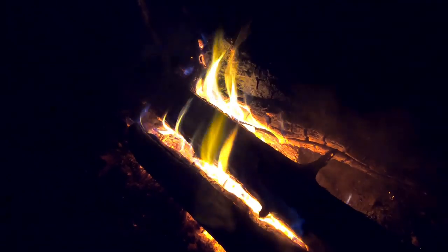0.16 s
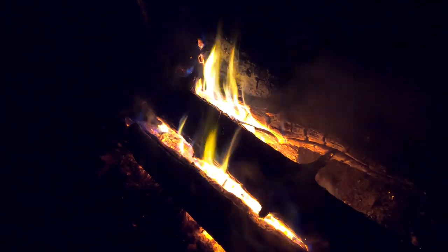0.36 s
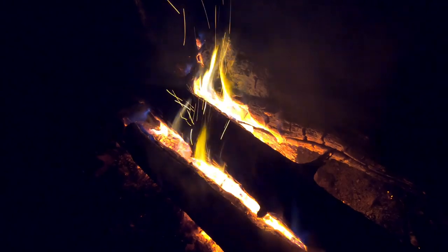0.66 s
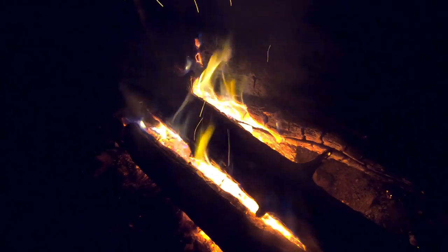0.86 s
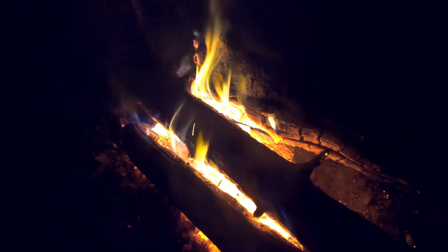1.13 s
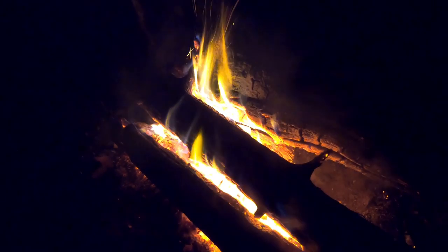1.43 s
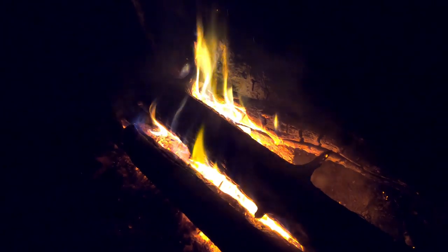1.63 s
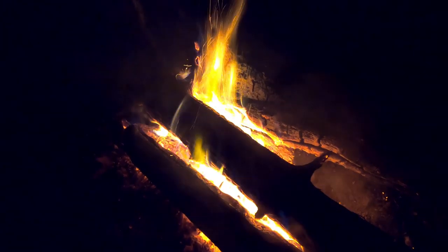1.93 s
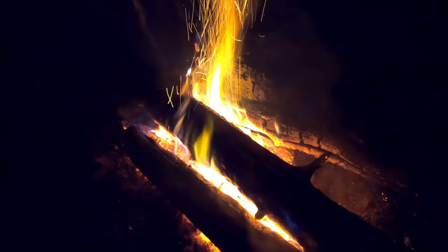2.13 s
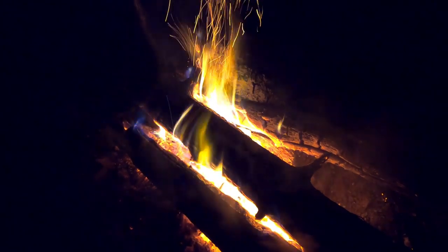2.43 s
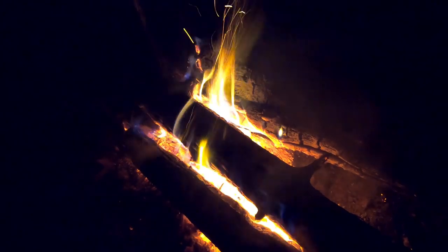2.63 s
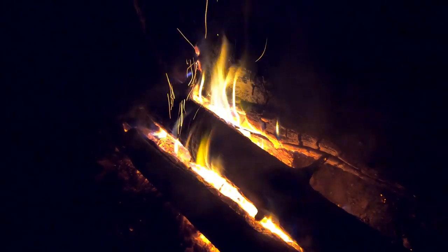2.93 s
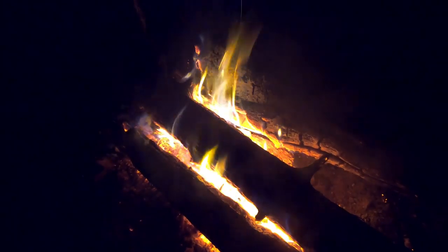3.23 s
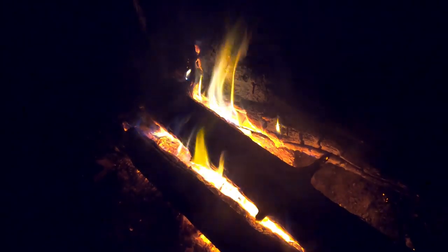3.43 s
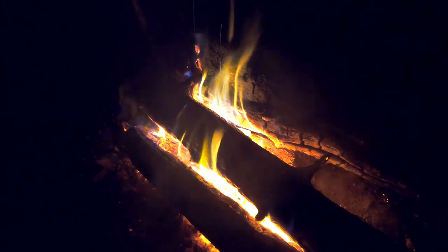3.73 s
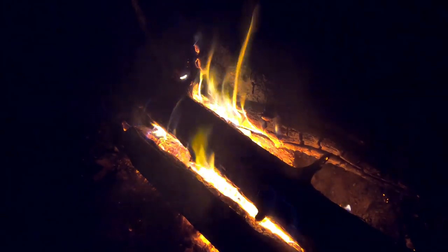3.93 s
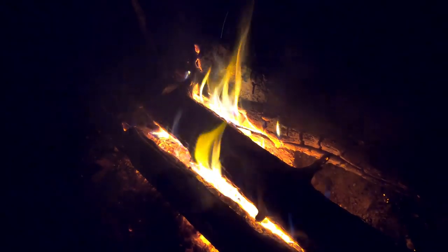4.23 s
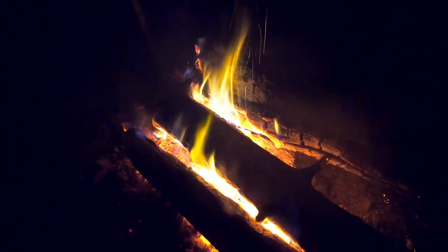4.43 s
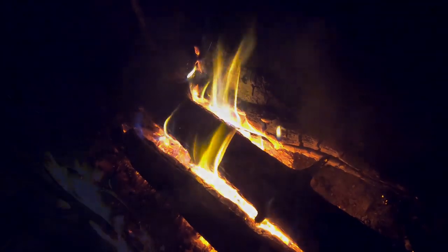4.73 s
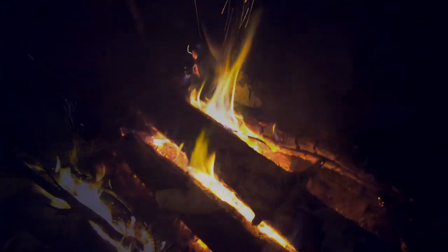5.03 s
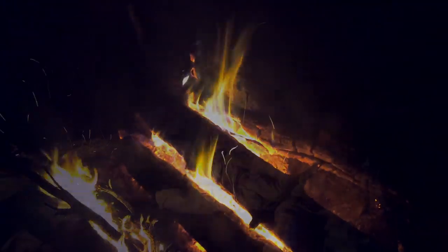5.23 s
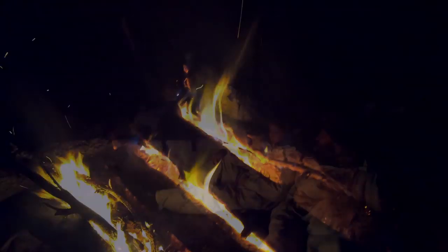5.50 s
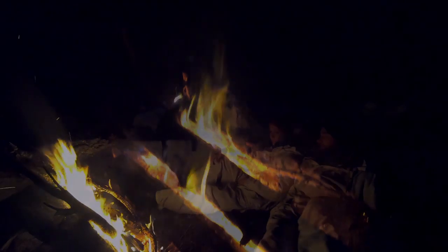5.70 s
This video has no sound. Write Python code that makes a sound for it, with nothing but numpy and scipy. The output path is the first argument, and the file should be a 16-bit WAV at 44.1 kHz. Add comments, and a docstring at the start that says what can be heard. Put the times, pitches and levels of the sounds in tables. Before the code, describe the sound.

Burning logs snap and tick close up, with quiet gas hiss and low flame flutter, before a rougher fire bursts in at the end.

```python
"""A faint tick over low, fluttering flames and hissing gas comes first, then sharp pops from a campfire at night.
Pops are short damped swings with a spray of noise, as pockets of steam burst in the logs; embers tick faintly.
Flames, gas and a distant drone are shaped noise with wandering levels; soft puffs are short swells of noise.
Near the end a livelier blaze, made of gritty noise, joins from the right."""
import sys
import numpy as np
from scipy import signal
from scipy.fft import rfft, irfft, next_fast_len
from scipy.io import wavfile
from scipy.ndimage import uniform_filter1d, map_coordinates

SR = 44100
rng = np.random.default_rng(int(sys.argv[2]) if len(sys.argv) > 2 else 0)


def dump(signal):
    """Clip the signal to [-1, 1] and save it as 16-bit WAV at the path in sys.argv[1]."""
    limited = np.clip(np.atleast_2d(signal).T, -1, 1)
    pcm = np.round(limited * 32767).astype(np.int16)
    wavfile.write(sys.argv[1], SR, pcm)


N = 258398  # length in samples

# Levels are settings before the fixed trims in the functions; noise colours give shape only.
# Steady flames: t/s, flutter level/dB
FLAME_LEVELS = [(0.0, -70), (0.21, -71.5), (0.67, -77.5), (0.92, -79.5), (1.13, -73), (1.24, -70.5),
                (1.59, -80), (1.96, -74), (2.39, -78), (3.28, -77), (3.48, -74), (4.79, -77.5), (5.35, -77),
                (5.5, -79.5)]
# Colour of the flames' flutter: f/Hz, level/dB per Hz
FLUTTER_COLOUR = [(53, -38), (90, -20), (130, -8), (167, 2.5), (220, -7.5), (311, -15), (362, -14),
                  (409, -15.5), (500, -35), (650, -57.5), (1100, -120)]
# Colour of the low draught: f/Hz, level/dB per Hz
DRAUGHT_COLOUR = [(12, -34.5), (20, 6.5), (86, 2.5), (110, -10.5), (140, -34), (240, -120)]
# Escaping gas: t/s, hiss level/dB
GAS_LEVELS = [(0.0, -74), (1.71, -72), (2.1, -70), (2.82, -77), (3.46, -72), (3.83, -75), (4.41, -71.5),
              (5.38, -75.5), (5.5, -71.5)]
# Colour of the hiss: f/Hz, level/dB per Hz
HISS_COLOUR = [(710, -42), (1200, -4.5), (2310, -1), (2470, -3.5), (3190, 1.5), (5070, -2), (6000, -8),
               (7800, -44.5), (13200, -120)]
# Colour of the finer, higher fizz: f/Hz, level/dB per Hz
FIZZ_COLOUR = [(2940, -45), (5000, -19.5), (5990, -1.5), (8200, -10.5), (9290, -4.5), (11200, -20.5),
               (14900, -28), (16500, -35.5)]
# Colour of the gas blowing off after the biggest burst: f/Hz, level/dB per Hz
VENT_COLOUR = [(300, -29.5), (550, -9), (1200, -6.5), (2500, 0.5), (3500, -1.5), (5500, -6.5),
               (9000, -12.5), (11000, -24.5), (16000, -50.5)]
# Colour of the distant drone: f/Hz, level/dB per Hz
DRONE_COLOUR = [(250, -39), (400, -7), (550, -11.5), (800, -1.5), (1000, -10.5), (1500, -18.5),
                (2500, -44.5)]
# Bursting steam pockets: t/s, burst level/dB, crack f/Hz, crack t60/s, thump level/dB, wood f/Hz,
# wood level/dB, splinter level/dB, left-minus-right level/dB, scatter level/dB
BURSTS = [(0.0004, -35.5, 3300, 0.004, -51, 700, -40, 3.5, 1, -11),
          (0.114, -15, 4900, 0.00029, -30.5, 560, -6.5, -0.5, -1, -14),
          (0.3536, -55, 2600, 0.0039, -43, 829, -29, 13, 0, -18),
          (0.3701, -38, 6900, 0.00085, -43, 660, -30, -23, -2, -14),
          (0.4373, -51.5, 3400, 0.0023, -15, 457, -21, 9, 0, -6),
          (0.5751, -2.5, 2910, 0.00099, -34, 730, -64, -6.5, -1.5, -14),
          (0.6001, -34, 3200, .00093, -16.5, 643, -8, -17, 0.5, -18),
          (0.635, -44, 3600, 0.0013, -30.5, 767, -25, 4, -2.5, -2),
          (0.6883, -47.5, 2960, 0.0016, -18.5, 640, 1.5, -1, 4.5, -7),
          (0.7031, -33, 3050, .00088, -40, 1375, -41, -8, -2.5, -7),
          (0.7189, -47, 1710, 0.0025, -28.5, 907, -8, 2, 3, -14),
          (0.7498, -7.5, 3387, .00098, -53.5, 1435, -27, 0, -1.5, -17.5),
          (1.1496, -51.5, 3140, 0.0012, -17.5, 797, -14.5, 5, -5, -1),
          (1.3221, -2.5, 3730, 0.0007, -42.5, 1241, -19.5, -13.5, -1, -14),
          (1.3624, -5.5, 2950, 0.00078, -32.5, 972, -28.5, -38, 2.5, -13.5),
          (1.6378, -11.5, 4940, 0.00058, -33, 604.6, -11, -6, -5.5, -13.5),
          (1.7084, -25.5, 2840, 0.0041, -40, 1400, -25, 15, 3, -28.5),
          (1.9052, 3, 2870, 0.00094, -18, 778, -16.5, -17, 1, -16),
          (1.9798, -32.5, 2840, 0.0011, -23.5, 1480, -29, 2, 0, -16),
          (2.3147, -1.5, 3167, 0.00086, -47.5, 978, -27, -5, 2.5, -21.5),
          (2.4965, -37, 3240, 0.00085, -36, 1460, -38.5, 1.5, 0, -10.5),
          (2.553, -41.5, 3340, 0.0017, -36, 883, -32.5, -27.5, -6, -16),
          (2.6947, -19, 3680, 0.00083, -34, 780, -50, 2.5, -5.5, -26),
          (2.7413, -2.5, 3407, 0.00084, -46.5, 1283, -35, -14, -0.5, -14.5),
          (2.958, -58.5, 8500, 0.00098, -18, 770, -23.5, 13.5, -1, -16),
          (3.158, -49.5, 4510, 0.00092, -41.5, 1226, -26.5, 0, -3, -26),
          (3.1793, -47.5, 3640, 0.0037, -35, 1167, -12.5, 5, -5, -8),
          (3.2532, -13, 4000, 0.0014, -58, 785, -14, -2, 1, -8),
          (3.387, -50, 3050, 0.0091, -24.5, 800, -25, -35, -5.5, -5.5),
          (3.4367, -51, 3960, 0.0014, -22.5, 850, -16, 3.5, -4, -11),
          (3.474, -27.5, 3112, .0013, -61, 1312, -47, -1.5, -5, -13),
          (3.5221, -40, 3820, 0.0024, -25, 834, -31, 2.5, -2, -8),
          (3.5619, -49.5, 2490, .001, -9, 677, -21, -9, -6.5, -19),
          (3.889, -21, 2580, 0.0032, -27.5, 616, -4, -6, -2, -12.5),
          (4.124, -48.5, 3584, 0.0026, -23.5, 684, -24, -23.5, -4, -18.5),
          (4.1709, -52.5, 5960, 0.0014, -11, 817, -21.5, 6.5, -4, -17.5),
          (4.3978, -5.5, 2370, 0.00042, -32, 862.4, -17, -7.5, -2, -13.5),
          (4.51, -50.5, 2750, 0.0024, -29, 1110, -15, -19.5, 1.5, -16.5),
          (4.5686, -39, 2890, 0.0021, -32, 1440, -24, 2.5, -2, -6.5),
          (4.6232, -29.5, 3700, 0.0021, -57, 1068, -48, 2, 2.5, -8.5),
          (4.635, -38, 3170, 0.0017, -43, 872, -28, -16, -4, -11),
          (4.8157, -3.5, 2380, 0.00067, -34.5, 700, -24, -18, 0.5, -12),
          (4.959, -41.5, 2860, 0.0019, -29.5, 730, -27.5, -2, -1.5, -5.5),
          (5.0684, -3, 3240, 0.00097, -36, 638, -52, -10.5, -5.5, -17.5),
          (5.371, -49.5, 3220, 0.0031, -32, 785, -23, 3, -6, -4),
          (5.3859, -45, 1652, 0.0014, -32, 947, -20, 1, 2, 0),
          (5.4073, -48, 3000, 0.00086, -28, 848, -21, -5, -5, -16),
          (5.47, -49, 3470, .003, -11, 735, -17, -26, -6.5, -19),
          (5.5548, -23, 5680, 0.00047, -30, 649, -39.5, -23, -5, -15),
          (5.6604, -43, 2030, 0.0011, -24, 1100, -13, -28, -12, -24),
          (5.699, -36.5, 2820, 0.0013, -29, 1420, -27, -5, -16, -1),
          (5.7156, -41, 2080, 0.0019, -40.5, 977, -20, -5.5, -32.5, -14)]
# Colour of the splinter spray: f/Hz, level/dB
SPLINTER_COLOUR = [(300, -49.5), (1200, -9), (3500, -6), (6500, 1), (9000, 1.5), (11000, -14), (16000, -22)]
# How fast the clearing's echoes die away: f/Hz, t60/s
CLEARING_DECAY = [(200, 0.24), (1000, 0.066), (4000, 0.025), (10000, 0.12)]
# Strength of those echoes, as long waves pass over the logs: f/Hz, level/dB
CLEARING_COLOUR = [(150, -9), (800, -5.5), (2000, 0), (8000, -1)]
# How strongly a blast front reaches the microphone ports: f/Hz, level/dB
FRONT_COLOUR = [(20, -26.5), (50, -5), (90, -5), (6500, -0.5), (8000, -8), (10000, -5), (12000, -14),
                (16000, -22.5)]
# Flame puffs: t/s, puff level/dB, time to the envelope's peak times four/s
PUFF_EVENTS = [(0.082, -53.5, 0.01), (0.203, -79, 0.035), (0.23, -56, 0.018), (0.273, -56, 0.01),
               (0.479, -58.5, 0.013), (0.851, -53.5, 0.0081), (1.102, -67, 0.013), (2.158, -59, 0.02),
               (2.653, -56.5, 0.02), (2.932, -64, 0.028), (3.312, -63, 0.024), (3.527, -55.5, 0.018),
               (3.651, -63, 0.025), (3.761, -59.5, 0.024), (4.181, -63.5, 0.037), (4.545, -62, 0.022),
               (5.441, -65.5, 0.031)]
# Late blaze: t/s, roar level/dB, flutter level/dB, draught level/dB
BLAZE_LEVELS = [(5.52, -54, -60, -77), (5.56, -55, -52.5, -49), (5.65, -57.5, -56, -63),
                (5.72, -55, -58, -54.5), (5.859, -62, -60.5, -68)]
# Colour of the blaze's roar: f/Hz, level/dB per Hz
ROAR_COLOUR = [(180, -19), (300, -1), (558, -6), (671, -2), (1430, -7.5), (2100, -4.5), (2440, -7.5),
               (2790, -4), (6030, -12), (8800, -11.5), (10000, -30), (14000, -40), (16500, -48.5)]
# Side of the blaze's roar: f/Hz, left-minus-right level/dB
ROAR_SIDES = [(60, 0), (110, -12), (200, -12), (380, 0), (700, -4.5), (1290, -11), (2380, -9.5),
              (4400, -3.5), (8120, 1.5), (15000, -15)]

DRAUGHT_DB, DRAUGHT_FOLLOWS, GUSTS_DB = -81.5, .4, 3  # base level, share of flutter's swing, slow gusts
FIZZ_DB, FIZZ_FOLLOWS = -79, 0.79  # mean level, share of the hiss's swing
VENT_DB, VENT_HOLD_S, VENT_T60_S = -61.5, .12, 1.0  # level held at first, then fading
RISE_SHARE = .1  # rise of a crack over its t60: long-ringing ticks start softly
SPRAY_T60_S = .008
AGAIN_DB, CHIME_DB = -15, -22  # second crack, and chime of the char under the first
LINGER_DB, LINGER_T60_S = -19.5, .2  # a fainter, longer echo from farther away
PUFF_HZ = 186
LEAD_FROM_DB = -6  # only bursts set above this level have forerunners
TOP_HZ = 16700


def amp(db):
    """Turn decibels into a plain multiplier."""
    return 10 ** (np.asarray(db) / 20)


def unit(x):
    """Scale to an rms of 1."""
    return x / np.sqrt(np.mean(x ** 2) + 1e-20)


def along(points, hz):
    """Read (Hz, value) points on a log frequency axis."""
    f, v = np.transpose(points)
    return np.interp(np.log(hz + 1), np.log(f + 1), v)


def curves(rows):
    """One value per sample for each column after the time."""
    s, *cols = np.transpose(rows)
    return [np.interp(np.arange(N) / SR, s, c) for c in cols]


def wobble(rate):
    """A smooth random curve, with rate random points a second."""
    knots = rng.standard_normal(int(N * rate / SR) + 4)
    return map_coordinates(knots, [np.arange(N) * rate / SR])


def filtered(x, response):
    """Multiply the spectrum of x by a response, which may be complex."""
    n = x.shape[-1]
    m = next_fast_len(n + 8192)
    return irfft(rfft(x, m) * response(np.fft.rfftfreq(m, 1 / SR)), m)[..., :n]


def rush(spectrum, alike, patchy_db):
    """Stereo noise, middle at rms 1, with patches of random gain; alike is the left-right likeness."""
    z = signal.stft(rng.standard_normal((2, N)), nperseg=512)[2]
    field = uniform_filter1d(rng.standard_normal(z.shape[1:]), 6, 0)
    field = uniform_filter1d(field, 8, 1)
    pair = signal.istft(z * amp(patchy_db * unit(field)), nperseg=512)[1][:, :N]
    middle, side = unit(filtered(pair, lambda hz: amp(along(spectrum, hz))))
    width = np.tan(np.arccos(np.clip(alike, -.99, .99)) / 2)
    return np.array([middle + width * side, middle - width * side])


def ring(t, hz, t60):
    """A damped swing that starts at once and falls 60 dB in t60 seconds."""
    return np.sin(2 * np.pi * hz * t) * amp(-60 * t / t60)


def flames(flutter_db, draught_db):
    """Flames flutter in lumps; the draught buffets the microphone ports."""
    flutter = amp(flutter_db + 1.5 + 0.7 * wobble(49)) * rush(FLUTTER_COLOUR, alike=0.67, patchy_db=3.0)
    draught = amp(draught_db - 4.0 + 1.4 * wobble(27)) * rush(DRAUGHT_COLOUR, alike=0.7, patchy_db=1.5)
    return flutter + draught


def hearth():
    """The steady flames: the draught leans on their strength and gusts by itself."""
    flutter_db, = curves(FLAME_LEVELS)
    swing_db = flutter_db - flutter_db.mean()
    draught_db = DRAUGHT_DB + DRAUGHT_FOLLOWS * swing_db + GUSTS_DB * wobble(1.7)
    return flames(flutter_db + 1.0, draught_db)


def gas():
    """Steam and wood gas hiss from the cracks; the biggest burst opens a vent that blows off."""
    hiss_db, = curves(GAS_LEVELS)
    biggest_s = max(BURSTS, key=lambda row: row[1])[0]
    since = np.arange(N) / SR - biggest_s
    vent_db = VENT_DB - 60 * np.clip(since - VENT_HOLD_S, 0, None) / VENT_T60_S + 1.5 * wobble(60)
    vent = (since > 0) * amp(vent_db) * rush(VENT_COLOUR, alike=.6, patchy_db=1.0)
    hiss = amp(hiss_db - 2.5 + .8 * wobble(40)) * rush(HISS_COLOUR, alike=.6, patchy_db=.8)
    fizz_db = FIZZ_DB + FIZZ_FOLLOWS * (hiss_db - hiss_db.mean())
    fizz = amp(fizz_db + .8 * wobble(21)) * rush(FIZZ_COLOUR, alike=.2, patchy_db=2)
    return vent + hiss + fizz


def night():
    """A distant drone of slowly wavering noise, wide in the stereo field."""
    return amp(-77.5 + 1.0 * wobble(1.4)) * rush(DRONE_COLOUR, alike=-0.32, patchy_db=4.0)


def pops():
    """Each burst: a suction-first crack, a knock of the log, a low puff of gas and a spray of splinters."""
    dry, wet = np.zeros((2, N + SR)), np.zeros((2, N + SR))
    t = np.arange(SR // 8) / SR
    for s, db, crack_hz, t60, thump_db, wood_hz, wood_db, splinter_db, pan_db, scatter_db in BURSTS:
        noise = rng.standard_normal((4, len(t)))
        # the minus sign makes the pressure dip first
        crack_rise = 1 - np.exp(-(t / (RISE_SHARE * t60)) ** 2)
        crack = -3.2 * crack_rise * ring(t, crack_hz, np.clip(t60, .0005, .05))
        crack = crack + amp(AGAIN_DB) * np.roll(crack, round(0.001484 * SR))  # the split runs on
        crack = crack - amp(CHIME_DB) * ring(t, crack_hz, .011)
        wood = -amp(wood_db + 11) * (1 - np.exp(-(t / .0006) ** 2)) * ring(t, wood_hz, 0.0058)
        swirl = unit(filtered(noise[3], lambda hz: 1 / (1 + ((hz - 60) / 45) ** 2)))
        swirl = swirl * amp(-60 * t / 0.2) * (1 - amp(-60 * t / 0.015))
        thump = (1 - np.exp(-(t / 0.00037) ** 2)) * ring(t, 150, 0.024)
        puff = amp(thump_db + 13.5) * (thump + 0.041 * swirl)
        # the spray swells again, off the next log
        bounce = amp(-11 - 60 * (t - .0024) / SPRAY_T60_S) * (t > .0024)
        spray = (noise[:2] + 0.043 * noise[2]) * (amp(-60 * t / SPRAY_T60_S) + bounce)
        spray = filtered(spray, lambda hz: amp(along(SPLINTER_COLOUR, hz)))
        # the long waves of the puff reach both ports alike
        sides = amp([[pan_db / 2], [-pan_db / 2]])
        burst = amp(db) * (puff + sides * (crack + amp(splinter_db) * spray))
        # the log flexes just before it splits
        burst = np.roll(burst, round(0.0012 * SR), axis=1) + amp(db) * sides * wood
        at = round(s * SR)
        dry[:, at:at + len(t)] += burst
        wet[:, at:at + len(t)] += amp(scatter_db) * burst
    return dry[:, :N], wet[:, :N]


def clearing(x):
    """Logs, stones and snow banks scatter each pop back as a brief, fading noise tail."""
    hz, t, z = signal.stft(rng.standard_normal((2, SR // 4)), SR, nperseg=128)
    near = amp(-60 * t / along(CLEARING_DECAY, hz)[:, None])
    far = amp(LINGER_DB - 60 * t / LINGER_T60_S)
    tail = signal.istft(z * (near + far), SR, nperseg=128)[1]
    # a little of each side leaks into the other
    tail = filtered(tail + 0.1 * tail[::-1], lambda f: amp(along(CLEARING_COLOUR, f)))
    late = np.pad(x, ((0, 0), (100, 0)))  # 100 samples of delay
    return signal.fftconvolve(late, tail / np.linalg.norm(tail[0]), axes=1)[:, :N]


def embers(rate):
    """Many faint, pitched ticks, rate a second, ring for a few swings at random moments."""
    rows = rng.random((int(rate * N / SR), 5))
    t = np.arange(256) / SR
    hz = 2600 * amp(10 * rows[:, 1:2])
    t60 = (5 + 14 * rows[:, 3:4] ** 2) / hz
    ticks = (1 - np.exp(-(t * hz) ** 2)) * ring(t, hz, t60) * amp(-47 - 16 * rows[:, 2:3])
    at = (rows[:, :1] * N).astype(int) + np.arange(256)
    pan = amp(6 * (rows[:, 4:] - .5))
    # add up all ticks, once for each side
    return np.array([np.bincount(at.ravel(), (ticks * g).ravel(), N + 256)[:N] for g in (pan, 1 / pan)])


def puffs():
    """Small pockets of gas catch with a soft, low flap: noise that swells and fades."""
    out, t = np.zeros(N + SR), np.arange(SR // 8) / SR
    for s, db, length in PUFF_EVENTS:
        flap = filtered(rng.standard_normal(len(t)),
                        lambda f: 1 / (1 + (1.17 * np.log((f + 1) / PUFF_HZ)) ** 4))
        u = 4 * t / np.clip(length, .005, .2)
        out[round(s * SR):][:len(t)] += amp(db - 4.5) * unit(flap) * u * np.exp(1 - u)
    return out[:N]


def forerunners(x):
    """Dull, faint copies run ahead of the loudest pops in even steps."""
    loud = np.zeros(N)
    for s, db, *_ in BURSTS:
        loud[round(s * SR):][:SR // 40] = db > LEAD_FROM_DB

    def ahead(hz):
        # turning the phase forward moves a copy 10.5 ms earlier per step
        copies = sum(amp(db) * np.exp(2j * np.pi * hz * k * .0105)
                     for k, db in enumerate([-23, -35, -52], 1))
        return copies / (1 + (hz / 4600) ** 6)

    return filtered(x * loud, ahead)


def blaze():
    """A louder, gritty fire sets in at once: fast-wobbling noise, leaning right, plus its own flames."""
    roar_db, flutter_db, draught_db = curves(BLAZE_LEVELS)
    roar = rush(ROAR_COLOUR, alike=0.68, patchy_db=0.0) * amp(1.4 * wobble(120) + .8 * wobble(30))
    roar = filtered(roar, lambda hz: amp(np.outer([.5, -.5], along(ROAR_SIDES, hz))))
    start = np.clip((np.arange(N) / SR - 5.511) / 0.0056, 0, 1)  # onset and rise in seconds
    return start * (amp(roar_db - 0.5) * roar + flames(flutter_db, draught_db))


def scene():
    """The loudest fronts are rounded off at the microphone capsules before they join the fire's bed."""
    bursts, scattered = pops()
    bursts = bursts / (1 + np.abs(bursts / .98) ** 4) ** (1 / 4)
    cracks = bursts + forerunners(bursts) + clearing(scattered) + embers(rate=36)
    cracks = filtered(cracks, lambda hz: amp(along(FRONT_COLOUR, hz)))
    return cracks + hearth() + puffs() + gas() + blaze() + night()


def record(dry):
    """The microphone's path keeps nothing above its band limit."""
    return filtered(dry, lambda hz: hz < TOP_HZ)


dry = scene()
out = record(dry)
dump(out)
```